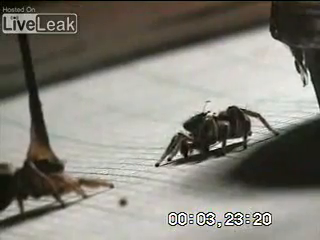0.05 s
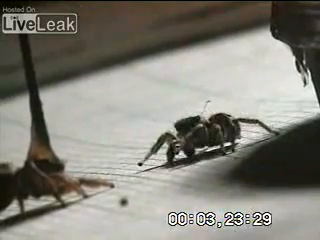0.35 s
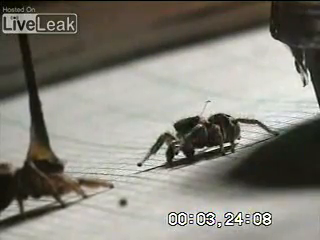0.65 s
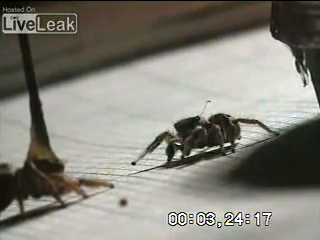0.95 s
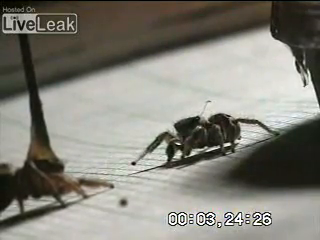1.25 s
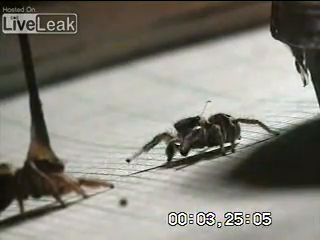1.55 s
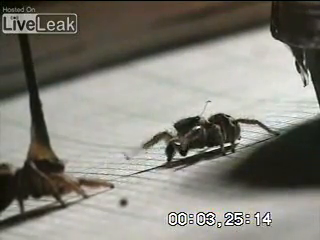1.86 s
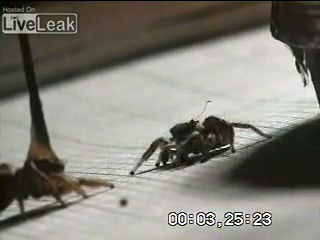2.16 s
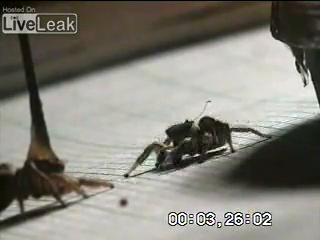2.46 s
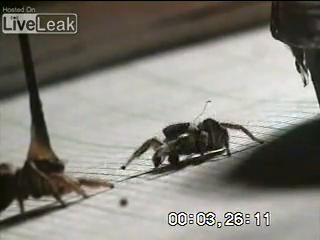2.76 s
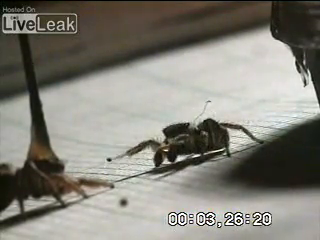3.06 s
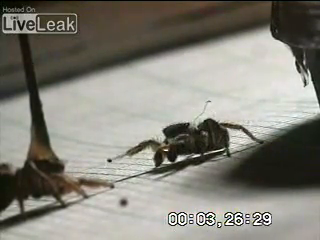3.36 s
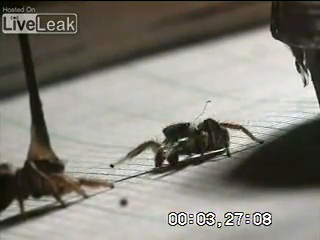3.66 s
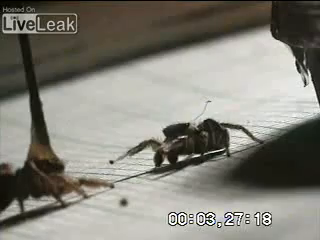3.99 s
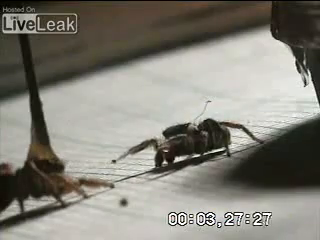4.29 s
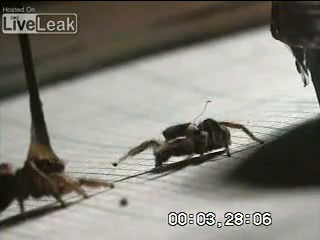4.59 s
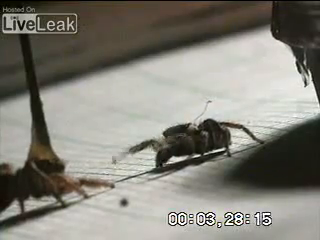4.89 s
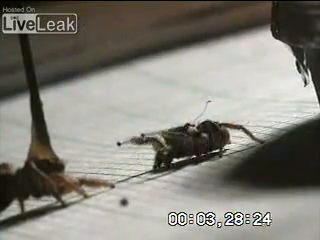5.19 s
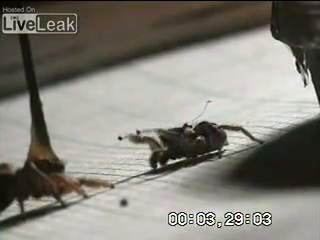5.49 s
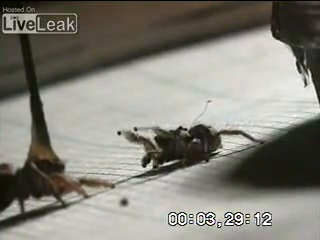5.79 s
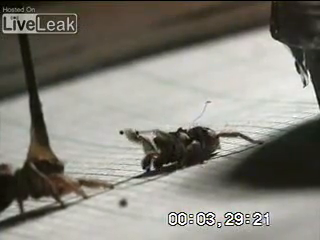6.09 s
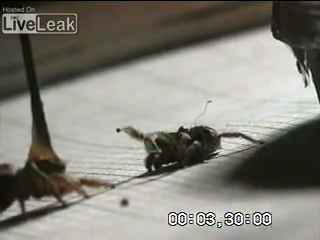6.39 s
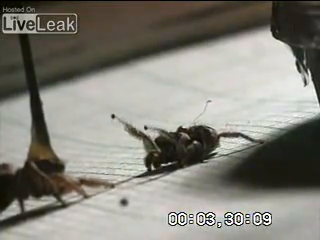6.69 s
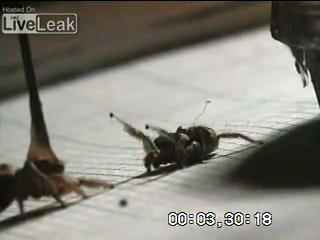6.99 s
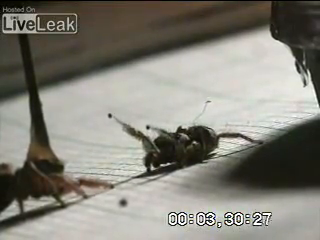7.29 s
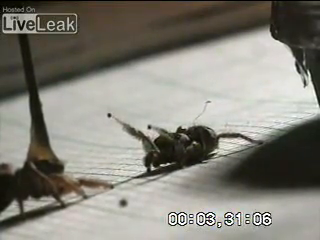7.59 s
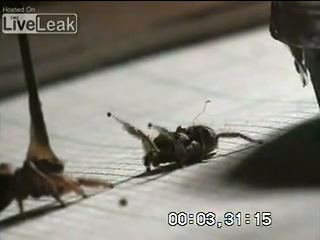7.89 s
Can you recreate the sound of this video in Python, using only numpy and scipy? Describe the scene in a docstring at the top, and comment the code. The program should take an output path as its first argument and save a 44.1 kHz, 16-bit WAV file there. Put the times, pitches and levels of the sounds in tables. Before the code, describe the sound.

Scattered scratchy ticks from a courting spider quicken into a fast, buzzing pulse train above a quiet rumble and hiss.

```python
"""Jumping spider courting, by contact

A vibration pickup on a taut sheet, the spider right on it; all of him arrives through the sheet.
He scrapes in stick-slip strokes, sparse at first and then seven a second. His legs brush the
surface and his trembling abdomen makes it hum. Under him the rig sways slowly, rocking hard in
the fast strokes, and the electronics add mains hum and hiss."""
import sys
import numpy as np
from scipy import signal
from scipy.fft import rfft, irfft, next_fast_len
from scipy.io import wavfile
from scipy.ndimage import map_coordinates

SR = 44100
rng = np.random.default_rng(int(sys.argv[2]) if len(sys.argv) > 2 else 0)


def output_pcm(signal):
    """Save a mono or channel-first signal as 16-bit PCM at the path in sys.argv[1].

    Samples are clipped to [-1, 1] before scaling.
    """
    pcm = np.clip(np.atleast_2d(signal).T, -1, 1) * 32767
    wavfile.write(sys.argv[1], SR, np.round(pcm).astype(np.int16))


N = 355005

# The rig's restless sway, and its hard rocking under the fast strokes. Each row: time in seconds,
# level in dB.
SWAY_LEVELS = [(0, -10.5), (.15, -22.5), (1.3, -26.5), (2.2, -22), (3.7, -26), (4.9, -21), (6.7, -17.5),
               (7.2, -29), (8.05, -27)]
ROCKING_LEVELS = [(6.85, -50), (7.03, -8), (7.26, -11.5), (7.51, -7), (7.69, -12), (8.05, -12)]
# Mains and motors in the building. Each row: pitch in Hz, level in dB, waver in dB.
MAINS_TONES = [(30.04, -27.5, 2.5), (54.3, -33.5, 3.5), (59.9, -23.5, 0.2), (120.25, -44.3, 0.5),
               (179.6, -47.5, 0.5), (241.2, -48, 2.5), (302, -52.5, 1.5), (419, -64, 1), (659, -58, .6),
               (775, -61, .6), (1016, -57, 1.5), (1071, -63.5, 1.5), (1258, -53, .7), (1333, -62, 1.5)]
# Their slow swell. Each row: time in seconds, gain in dB.
MAINS_SWELL = [(0, -0.5), (1.5, -1), (3, -0.6), (4.5, 0), (6, 0.6), (8.05, 2)]
# Colours of rumble, hiss and leg hairs. Each row: frequency in Hz, relative level in dB.
RUMBLE_COLOUR = [(8, 2.5), (14, 2), (30, 7.5), (38, -16.5), (65, -10), (80, -17), (100, -12.5), (165, -23),
                 (230, -14.5), (280, -30), (330, -30.5), (420, -54)]
HISS_COLOUR = [(150, -22), (330, -0.5), (450, -1.5), (700, -3), (1000, -2.5), (1400, -5), (2000, -8),
               (3000, -11.5), (4000, -15.5), (5500, -20.5), (7000, -25), (9000, -31), (11000, -56),
               (13000, -64)]
BRUSH_SPECTRUM = [(600, -21), (1100, 16), (1800, -12), (2700, 6), (3400, 4.5), (4300, -11), (7000, -13),
                  (9000, -26), (12000, -45)]
# Sheet modes for the low drumming, the knock, the scratch and the snap. Each row: frequency in Hz,
# width in Hz, gain in dB.
SHEET_DRUM = [(69, 22, -2), (123.4, 30, -4), (158.4, 19.7, 0), (228, 48.5, -1.5), (292.6, 34.6, -3),
              (442, 158, -20)]
SHEET_KNOCK = [(764, 53, -8), (910, 69, 1.5), (1011, 76, 3.5), (1070.5, 57, 4), (1261.5, 80, 0),
               (1345, 70, -2), (1462, 130, -14)]
SHEET_SCRATCH = [(1706, 22, 2.5), (1997, 85, 2.5), (2610, 170, 4.5), (2933, 220, 3), (3153, 226, -1),
                 (3410, 197, -4), (4340, 590, -22), (6490, 240, -21), (7200, 190, -23)]
SHEET_SNAP = [(4500, 1500, 0), (6750, 1600, -2)]
# The spider shifting his weight. Each row: time in seconds, rustle in dB.
WEIGHT_SHIFTS = [(0, -45.5), (2.2, -46), (2.45, -40), (2.8, -50.5), (3.3, -52), (4.4, -46.5), (4.9, -47),
                 (5.3, -47.5), (6.05, -42.5), (6.3, -36.5), (8.05, -33.5)]
# Legs passing over the sheet. Each row: middle in seconds, length in seconds, level in dB.
LEG_BRUSHES = [(.215, 0.041, -46.5), (0.83, 0.0099, -48), (2.043, 0.035, -44), (2.143, .035, -43),
               (2.53, 0.033, -43), (5.075, 0.0074, -35), (5.798, 0.034, -49), (5.875, 0.12, -41.5),
               (6.243, 0.055, -45.5), (6.347, 0.041, -48)]
# Trembles between strokes. Each row: middle and length in seconds, hum and upper hum in dB.
ABDOMEN_TREMBLES = [(0.216, 0.04, -33.5, -45), (0.818, 0.037, -33, -48), (1.525, 0.057, -27.5, -43),
                    (2.911, 0.05, -35, -36), (5.01, 0.037, -36.5, -39), (5.387, 0.11, -34, -45),
                    (5.593, 0.025, -33, -47), (6.138, 0.047, -56, -32), (6.25, 0.039, -32.5, -35),
                    (6.347, 0.035, -25, -53), (6.46, 0.2, -32, -40), (6.77, 0.035, -27, -31.5),
                    (7.5, 0.063, -27, -38)]
# Single slips. Each row: time in seconds, knock and scratch in dB, knock tilt in dB per octave.
SCRAPER_FLICKS = [(0.266, -24.5, -36, -3), (0.2959, -25, -27.5, -1), (0.8256, -35, -29.5, -5),
                  (2.5284, -17.5, -28, 8), (5.1563, -27, -29.5, -2), (5.2633, -42, -33, 2),
                  (5.2792, -29, -35, -5), (5.3667, -25.5, -29, -13), (5.5614, -34, -24.5, 1),
                  (5.7153, -32, -29.5, 8), (5.903, -38, -24, 3), (6.1131, -20, -23, 4),
                  (6.2053, -42, -33, 2), (6.233, -29, -33.5, -14), (6.3255, -28, -27, -5),
                  (6.5283, -36, -29, 1), (6.6817, -23.5, -28, 2), (6.759, -22, -37, 12),
                  (6.8375, -16, -27, 1), (7.0529, -21, -30, -4), (7.2522, -15, -26, -12),
                  (7.4836, -14.5, -23, 3), (7.628, -30, -33, 4), (7.837, -21, -32, 4),
                  (7.855, -22.5, -34, 1)]
# Runs of slips. Each row: start, hardest slip and end in seconds; knock, scratch and easing at the
# ends in dB; knock tilt in dB per octave; hum and upper hum in dB.
SCRAPER_STROKES = [(1.957, 1.9688, 1.9688, -24.5, -31, 2, 5, -37, -43),
                   (2.036, 2.0522, 2.064, -23, -25, 0.5, 15, -39, -43),
                   (2.1258, 2.1258, 2.136, -24, -28.5, 0, 3, -37, -40),
                   (2.5857, 2.601, 2.609, -20, -25, 6, 15, -31, -37),
                   (5.074, 5.0857, 5.0857, -21.5, -26, 7, -9, -23.5, -32),
                   (5.637, 5.6473, 5.6473, -20.5, -21, 6, 5, -30, -34),
                   (5.811, 5.8208, 5.8326, -25, -26, 4, 3, -30, -34),
                   (6.551, 6.575, 6.589, -10.5, -19.5, 9, 0, -24.5, -26),
                   (6.694, 6.727, 6.74, -12, -16.5, 3.5, -3, -17.5, -26),
                   (6.817, 6.8724, 6.924, -7, -15, 16.5, -2.5, -16.5, -23.5),
                   (6.9656, 7.013, 7.027, -14.5, -20.5, 5.5, -2, -22, -19.5),
                   (7.0917, 7.1347, 7.147, -12.5, -22, 5, 1, -28, -26),
                   (7.2065, 7.2189, 7.265, -15, -25.5, 2, 5, -22.5, -28.5),
                   (7.3253, 7.3458, 7.3926, -15.5, -25, 2, -2, -20.5, -35),
                   (7.4317, 7.4395, 7.4548, -21, -32, -1.5, 2, -36, -41),
                   (7.549, 7.5792, 7.612, -17.5, -25.5, 3.5, -2, -25.5, -31),
                   (7.6514, 7.6865, 7.711, -13.5, -23.5, 2.5, 0, -35, -27),
                   (7.7662, 7.7755, 7.815, -16, -25, 3, 10, -20.5, -43),
                   (7.8762, 7.9097, 7.947, -17, -25, 0.5, -2, -17.5, -35),
                   (7.989, 8.0302, 8.042, -17.5, -24.5, 1.5, -7, -24.5, -30)]
# The scraper's hard catches. Each row: time in seconds, peak in dB.
SCRAPER_SNAPS = [(1.9694, -37), (2.1261, -38), (5.6481, -36), (6.1145, -35), (6.566, -35), (6.726, -33),
                 (6.8735, -42), (7.0145, -35.5), (7.1342, -37), (7.4829, -36)]

SWAY_HZ, SWAY_WIDTH_HZ = 21.38, 4.45
TREMBLE_HZ, UPPER_MODE_HZ = 200.2, 285.2
HUM_LAG_S, HUM_BASE_S, HUM_LENGTH_SHARE = 0.016, 0.03, 0.66  # the abdomen's swell trails each stroke
SLIP_GAP_S, SLIP_JITTER_S, SLIP_SPREAD_DB = 0.0115, 0.001633, 1.5
BREAKAWAY_DB, HARDEST_DB = 1.5, 2  # extra force of a stroke's first slip, and of its hardest
TILT_FALL, TILT_SPREAD = 8.9, 5.1  # dB per octave: the knock darkens along a stroke and varies by slip


def from_db(db):
    """Decibels to gain."""
    return 10 ** (np.asarray(db) / 20)


def rms_one(x):
    """Scale to unit power."""
    return x / np.sqrt(np.mean(x ** 2) + 1e-20)


def in_time(rows):
    """A curve read at every sample."""
    return np.interp(np.arange(N) / SR, *np.transpose(rows))


def drift(rate):
    """A smooth random curve, about rate turns a second, rms 1."""
    knots = rng.standard_normal(4096)
    return rms_one(map_coordinates(knots, [np.arange(N) / SR * rate], order=3, mode="wrap"))


def tone(hz, wander_hz, rate):
    """A sine whose pitch wanders."""
    return np.sin(2 * np.pi * (np.cumsum(hz + wander_hz * drift(rate)) / SR + rng.random()))


def noise(spectrum):
    """Steady noise of a given colour, rms 1."""
    hz, db = np.transpose(spectrum)
    size = next_fast_len(N)
    bins_hz = np.maximum(np.arange(size // 2 + 1) * SR / size, 1)
    colour = from_db(np.interp(np.log(bins_hz), np.log(hz), db))
    return rms_one(irfft(rfft(rng.standard_normal(size)) * colour, size)[:N])


def resonate(force, modes):
    """Parallel resonances; neighbouring modes move in opposite directions at the pickup."""
    out = 0
    for k, (hz, width, db) in enumerate(modes):
        r = np.exp(-np.pi * width / SR)
        poles = [1, -2 * r * np.cos(2 * np.pi * hz / SR), r * r]
        ring = signal.lfilter([1, 0, -1], poles, force + 1e-18)
        out = out + (-1) ** k * from_db(db) * (1 - r * r) / 2 * ring
    return out


def high_pass(x, edge_hz):
    """Second-order bass cut."""
    return signal.sosfilt(signal.butter(2, edge_hz, "high", fs=SR, output="sos"), x)


def grains(shape, per_s):
    """Random clicks of uneven size: single ridges catching."""
    return (rng.random(shape) < per_s / SR) * rng.standard_normal(shape)


def pressure(x, hold_s):
    """How hard the scraper bears on: it rises with each slip and eases off afterwards."""
    keep = np.exp(-1 / (hold_s * SR))
    return np.sqrt(signal.lfilter([1 - keep], [1, -keep], x ** 2 + 1e-14))


def swell(middle, length):
    """A bell-shaped rise and fall, half as high at the ends of its length."""
    out = np.zeros(N)
    near = np.arange(max(int((middle - 2 * length) * SR), 0), min(int((middle + 2 * length) * SR), N))
    out[near] = 2 ** -((2 * (near / SR - middle) / length) ** 2)
    return out


def place(rings, times, peak_db):
    """Set each short ring at its time and height."""
    out = np.zeros(N + SR)
    for ring, s, db in zip(rings, times, peak_db):
        start = int(s * SR)
        out[start:start + len(ring)] += from_db(db) * ring / np.abs(ring).max()
    return out[:N]


def rig_sway():
    """The stand under the sheet sways and rocks at its own low pitch."""
    stand = [(SWAY_HZ, SWAY_WIDTH_HZ, 0)]
    jostle = rng.standard_normal(N + SR)  # a spare second lets the resonance build
    sway = from_db(in_time(SWAY_LEVELS)) * rms_one(resonate(resonate(jostle, stand), stand)[SR:])
    rocking = np.sqrt(2) * from_db(in_time(ROCKING_LEVELS)) * tone(SWAY_HZ, wander_hz=0.56, rate=6.6)
    return sway + rocking


def mains_hum():
    """Mains and the building's motors, each tone wavering on its own."""
    hum = 0
    for hz, db, waver_db in MAINS_TONES:
        height = np.sqrt(2) * from_db(db + waver_db * drift(rate=4.1))
        hum = hum + height * tone(hz, wander_hz=0.092, rate=3.11)
    return from_db(in_time(MAINS_SWELL)) * hum


def noise_floor(rumble_db=-29.5, hiss_db=-43.41):
    """Steady rumble, and hiss from the electronics."""
    return from_db(rumble_db) * noise(RUMBLE_COLOUR) + from_db(hiss_db) * noise(HISS_COLOUR)


def drumming(knock, drum_db=-8):
    """The whole sheet stirs as he shifts his weight, and after each knock."""
    heave = from_db(drum_db) * pressure(knock, hold_s=0.0082) + from_db(in_time(WEIGHT_SHIFTS))
    return heave * rms_one(resonate(grains(N, per_s=900), SHEET_DRUM))


def brushing():
    """Leg hairs sweep the sheet with a soft hiss."""
    sweeps = sum(from_db(db) * swell(middle, length) for middle, length, db in LEG_BRUSHES)
    return sweeps * noise(BRUSH_SPECTRUM)


def trembling(upper_trim_db=-2, stir_db=-17):
    """The abdomen shakes in short swells; the sheet's next mode sings along and the others stir."""
    with_strokes = [((start + end) / 2 + HUM_LAG_S, HUM_BASE_S + HUM_LENGTH_SHARE * (end - start),
                     hum_db, upper_db) for start, _, end, *_, hum_db, upper_db in SCRAPER_STROKES]
    main, upper = 0, 0
    for middle, length, hum_db, upper_db in with_strokes + list(ABDOMEN_TREMBLES):
        shape = swell(middle, length)
        main = main + from_db(hum_db) * shape
        upper = upper + from_db(upper_db + upper_trim_db) * shape
    stir = from_db(stir_db) * rms_one(resonate(grains(N, per_s=1000), SHEET_DRUM))
    hum = main * (tone(TREMBLE_HZ, wander_hz=2.21, rate=22) + stir)
    return hum + upper * tone(UPPER_MODE_HZ, wander_hz=7.63, rate=29)


def stick_slip():
    """Every slip, in rows like the flicks: a stroke breaks loose, bears down, then eases off."""
    rows = list(SCRAPER_FLICKS)
    for start, hardest, end, knock_db, scratch_db, ease_db, tilt, _, _ in SCRAPER_STROKES:
        before, after = round((hardest - start) / SLIP_GAP_S), round((end - hardest) / SLIP_GAP_S)
        # -1 at the start, 0 at the hardest slip, 1 at the end
        along = np.r_[np.linspace(-1, 0, before + 1)[:-1], np.linspace(0, 1, after + 1)]
        for u, (jitter, dull, bright, angle) in zip(along, rng.standard_normal(size=(16, 4))):
            inner = 0 < abs(u) < 1
            s = np.interp(u, [-1, 0, 1], [start, hardest, end]) + SLIP_JITTER_S * jitter * inner
            force_db = BREAKAWAY_DB * (u == -1) - HARDEST_DB * (u != 0) - ease_db * abs(u)
            rows.append((s, knock_db + force_db + SLIP_SPREAD_DB * dull * inner,
                         scratch_db + force_db + SLIP_SPREAD_DB * bright * inner,
                         tilt - TILT_FALL * u / 2 + TILT_SPREAD * angle))
    return np.array(rows)


def slips(times, peak_db, modes, catch_s, ridge_share, edge_hz, lead_s):
    """Each slip is one jolt and a quickly fading run of ridges, ringing in the sheet."""
    age = np.arange(2048) / SR
    force = ridge_share * grains((len(times), len(age)), per_s=4000) * np.exp(-age / catch_s)
    force[:, 0] += rng.choice([-1, 1], len(times))  # the scraper jumps either way
    return place(high_pass(resonate(force, modes), edge_hz), times - lead_s, peak_db)


def rubbing(jolts, modes, gain_db, hold_s, per_s, edge_hz):
    """Fine friction between slips, following the scraper's pressure."""
    friction = rms_one(high_pass(resonate(grains(N, per_s), modes), edge_hz))
    return from_db(gain_db) * pressure(jolts, hold_s) * friction


def scraping(knock_trim_db=-0.5, scratch_trim_db=-0.95):
    """Slips reach the pickup as a dull knock and a bright scratch, with rubbing and drumming."""
    times, knock_db, scratch_db, tilt = stick_slip().T
    # the angle of each slip favours the lower or the higher modes
    tilted = [(hz, width, db + tilt[:, None] * np.log2(hz / SHEET_KNOCK[0][0]))
              for hz, width, db in SHEET_KNOCK]
    knock = slips(times, knock_db + knock_trim_db, tilted,
                  catch_s=0.0011, ridge_share=0.27, edge_hz=220, lead_s=0.00099)
    scratch = slips(times, scratch_db + scratch_trim_db, SHEET_SCRATCH,
                    catch_s=0.0046, ridge_share=0.32, edge_hz=1130, lead_s=0.00023)
    dull_rub = rubbing(knock, SHEET_KNOCK, gain_db=-7, hold_s=0.013, per_s=1500, edge_hz=340)
    bright_rub = rubbing(scratch, SHEET_SCRATCH, gain_db=-6, hold_s=0.0096, per_s=2000, edge_hz=1700)
    return knock + scratch + dull_rub + bright_rub + drumming(knock)


def snaps(crack_s=0.0013, lag_s=0.00104):
    """The hardest catches crack far up into the treble."""
    times, peak_db = np.transpose(SCRAPER_SNAPS)
    age = np.arange(512) / SR
    force = rng.standard_normal((len(times), len(age))) * np.exp(-age / crack_s)
    return place(resonate(force, SHEET_SNAP), times + lag_s, peak_db)


def scene():
    """One pickup, mono: the spider over the rig's own noises."""
    spider = scraping() + snaps() + brushing() + trembling()
    return (spider + rig_sway() + mains_hum() + noise_floor())[None, :]


def record(dry, ceiling=0.69, cutoff_hz=11000):
    """The amplifier flattens the widest swings; the top is cut."""
    limited = dry / (1 + (dry / ceiling) ** 12) ** (1 / 12)
    return signal.sosfilt(signal.ellip(12, .1, 90, cutoff_hz, fs=SR, output="sos"), limited)


dry = scene()
out = record(dry)
output_pcm(out)
```